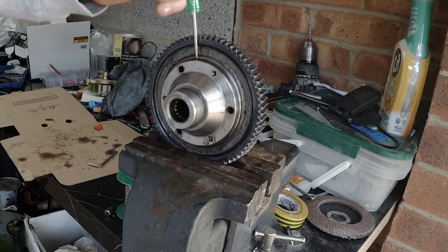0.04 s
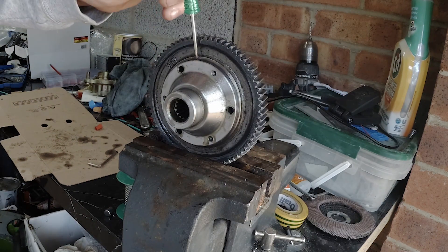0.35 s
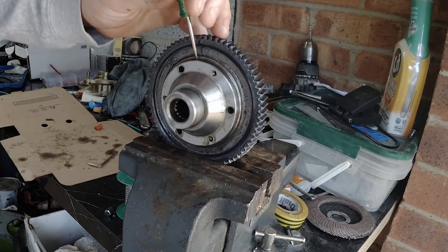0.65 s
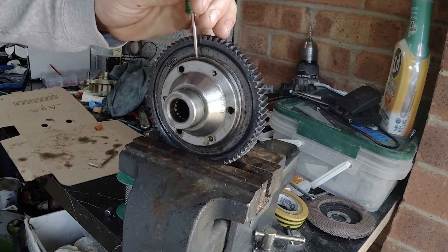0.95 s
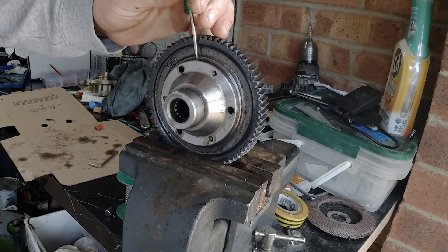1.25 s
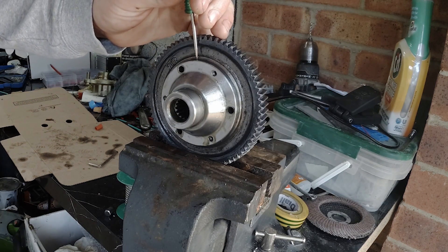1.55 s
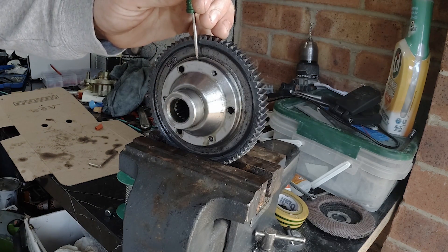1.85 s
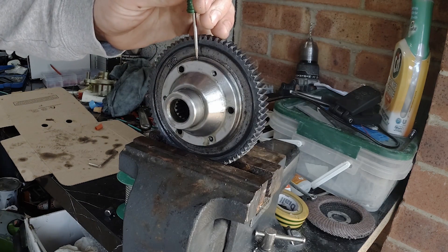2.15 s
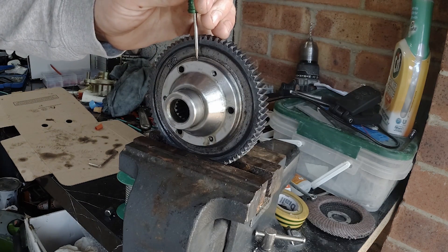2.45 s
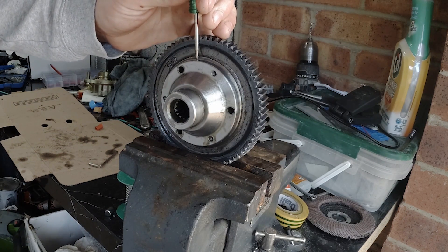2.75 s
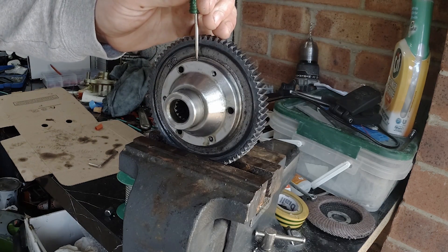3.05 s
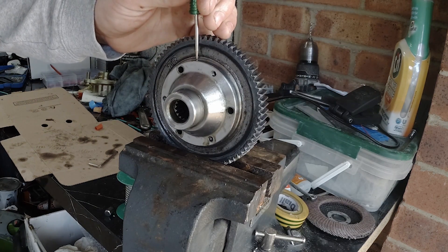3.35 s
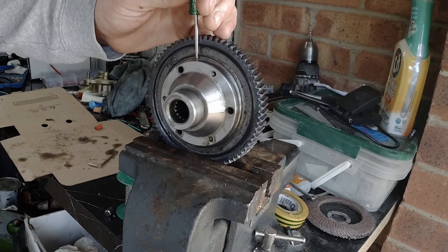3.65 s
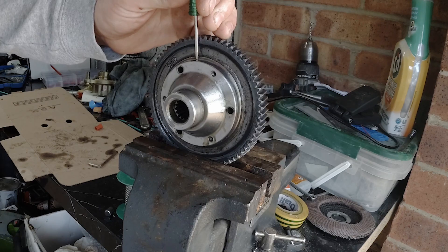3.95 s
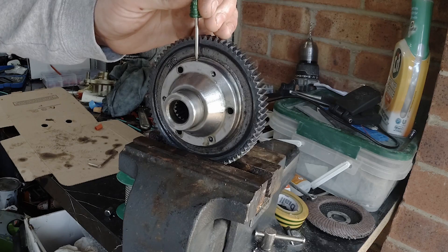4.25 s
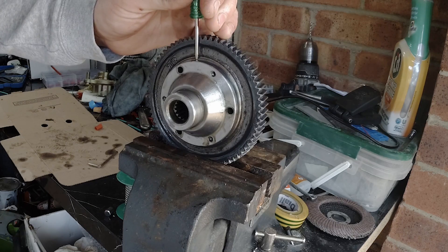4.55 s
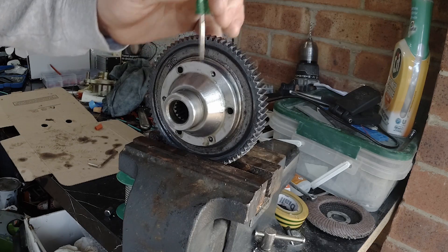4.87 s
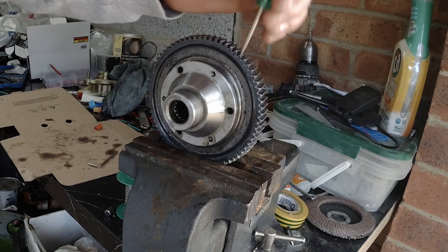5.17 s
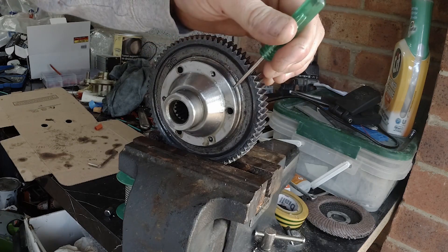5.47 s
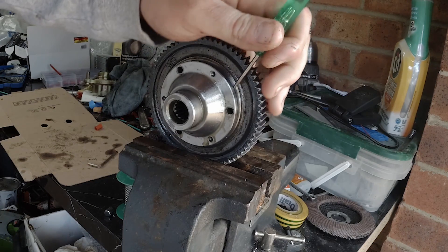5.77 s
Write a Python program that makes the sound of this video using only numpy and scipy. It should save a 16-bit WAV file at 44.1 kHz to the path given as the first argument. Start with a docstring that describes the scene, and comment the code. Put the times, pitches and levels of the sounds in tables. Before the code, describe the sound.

Close, steady hammer taps drive a screwdriver against a steel gear on a vise, after one light tick of the tip. The first blows are dull knocks with a sharp snap and a wooden bench thud; later ones quicken slightly and tighten into brighter clanks. A few soft metal ticks follow as the tool moves. Behind are a small workshop's quiet drone, hiss and very thin electrical whine.

```python
"""A hammer taps a screwdriver held as a punch on a steel ring gear, on a vise in a small brick workshop.
Each blow is a bright crack of the tool over the ringing modes of gear, jaws, vise and wooden bench.
The first blows land as dull knocks; as the gear seats they tighten into a higher clank over the thud.
The tip ticks as it is placed and moved. Behind: a low room drone, hiss and a thin electrical whine."""
import sys
import numpy as np
from scipy import signal
from scipy.fft import rfft, irfft, next_fast_len
from scipy.io import wavfile
from scipy.ndimage import map_coordinates

SR = 44100
rng = np.random.default_rng(int(sys.argv[2]) if len(sys.argv) > 2 else 0)


def generate_wav(signal):
    """Clip the signal to [-1, 1] and save it as 16-bit WAV at the path in sys.argv[1]."""
    frames = np.transpose(np.atleast_2d(signal))
    scaled = np.clip(frames, -1, 1) * 32767
    pcm = np.round(scaled).astype(np.int16)
    wavfile.write(sys.argv[1], SR, pcm)


N = 265041
T = np.arange(SR // 2) / SR  # time since a hit [s]

# tone of the air bed: (frequency [Hz], relative level [dB])
AIR_EQ = [(25, -38), (55, -21.5), (80, -31), (110, -15), (135, -21), (215, -4), (350, -14), (950, -21),
          (1600, -30.5), (2900, -40.5), (3600, -36.5), (4800, -41.5), (12500, -41), (15400, -37.5)]
# how alike its two sides are: (frequency [Hz], coherence [clipped at 1])
AIR_COHERENCE = [(60, 1.1), (300, 0.92), (700, 1.06), (1400, 0.82), (3000, -0.05), (7000, 0.76),
                 (15000, 0.34)]
# its balance: (frequency [Hz], left minus right [dB])
AIR_PAN = [(700, -0.5), (1300, 1), (2400, -5.5), (4400, -2), (8000, 0), (14000, -1.5)]
# fader ride of the drone: (time [s], level [dB])
DRONE_RIDE = [(0, -63), (1, -68.5), (1.6, -54), (2.5, -63.5), (4.8, -62), (6, -70.5)]
# electrical tones: (frequency [Hz], level [dB])
WHINE_TONES = [(15704, -77), (15644, -89)]
# reverb decay: (frequency [Hz], t60 [s])
ROOM_DECAY = [(150, 0.76), (500, 0.42), (1400, 0.3), (3000, 0.11), (7000, 0.1), (14000, 0.17)]
# slaps off bench and walls, negative inverts: (delay [s], knock gain [ratio], clank gain [ratio])
EARLY_ECHOES = [(.0082, -0.57, 0.033), (0.0138, 0.94, 0.24), (0.023, .75, 0.1)]
# the tip touches the gear: (time [s], level [dB])
TIP_TOUCHES = [(0.0921, -48.5), (4.9025, -56.5), (4.9277, -58.5), (5.3254, -57), (5.364, -64)]
# tone of the tick, the crack and the shading on the crack's far side: (frequency [Hz], gain [dB])
TICK_EQ = [(500, -49), (2800, -5), (3500, -16), (4000, 5.5), (4700, -8), (6500, -4), (10000, -9.5),
           (16000, -4.5)]
CRACK_EQ = [(400, -23), (1700, -2.5), (2150, -1.5), (2600, 0), (3300, 1.5), (4100, 0), (5400, -8.5),
            (6100, -5.5), (8000, -15.5), (8900, -12), (10500, -19), (12700, -20), (13800, -41),
            (16000, -10)]
FAR_SIDE_EQ = [(1500, 9.5), (4000, -11), (8000, -1.5), (13000, 3)]
# ring of each struck part: (frequency [Hz], relative level [dB], t60 [s])
BENCH_MODES = [(94.3, -6.5, 0.21), (128, -7, 0.26), (149.3, -14.5, 0.36), (178.1, -4.5, 0.33),
               (188.7, -1.5, 0.32), (206.7, 7.5, 0.19), (263.2, -7.5, 0.25), (273.5, -6, 0.47)]
VISE_MODES = [(149.6, -23, 0.44), (227.5, -19, 0.17), (295.8, -15.5, 0.24), (365.4, -30.5, 0.23),
              (433.6, 0.6, 0.1), (498.8, -19, 0.2), (551.4, -13.5, 0.22), (581, -17, 0.19), (664, 2, 0.037),
              (687.7, -7, 0.1)]
JAW_MODES = [(740, -2.5, 0.069), (841.8, -1, 0.096), (875, -12.5, 0.24), (950, -3.5, 0.11),
             (1054, -6.5, 0.086)]
GEAR_MODES = [(1185, -31, .13), (1260, -30, .11), (1335, -13.5, .16), (1368, -16.5, .15), (1405, -27, .11),
              (1568, -17, .11)]
SHAFT_MODES = [(2100, 3, 0.14), (2180, 3, 0.1), (2530, -13, 0.042), (3020, -6, 0.083), (3810, -1, 0.055),
               (3880, -18, 0.043), (5300, -30, 0.034), (5890, -9, 0.046), (8770, -7, 0.024),
               (8990, 3.5, 0.04)]
# each part's first heave, gone in a few cycles: (frequency [Hz], relative level [dB], t60 [s])
BENCH_PUNCH = [(225, -3, 0.023)]
VISE_PUNCH = [(196, -2, 0.01), (453, 13, 0.0089)]
JAW_PUNCH = [(667, 7.6, 0.011)]
GEAR_PUNCH = [(1174, 8.8, 0.013), (1363, 7.5, 0.014)]
# the mix moves from vise to jaws to gear as the gear is driven home: (seating [0 loose, 1 tight],
# crack [dB], bench thud [dB], vise knock [dB], jaw clack [dB], gear clank [dB], clank pitch [ratio],
# bite of the crack [dB])
SEATING_MIX = [ (.1, -37, -40.5, -26.5, -44.5, -46.5, 1.114, 1),
               (.28, -33, -43, -25.5, -34, -37.5, 1.056, 0.5),
               (.5, -33.3, -42.5, -34.5, -31.5, -33, 0.98, -3),
               (.73, -39, -42.5, -40.5, -42.5, -30, 1.04, 0), (.86, -34, -47, -40.5, -44.5, -30.5, 1.07, 8),
               (1, -34, -43.5, -39, -45.5, -34.5, 1.073, 6.5)]
# hammer hits: (time [s], force [dB], treble drive [dB], accent frequency [Hz], accent boost [dB])
HAMMER_HITS = [ (1.0076, -11.5, -12, 3900, 9), (1.2783, -5.5, 6, 2840, 7.5), (1.5584, -0.5, 4, 2910, 10.5),
               (1.838, 0, 0, 3920, 2), (2.112, 0.5, 4, 5600, 6.5), (2.3963, 0, 4, 5030, 7.5),
               (2.6536, -0.5, 3, 4700, 8), (2.9051, -1.5, 0, 4600, 4.5), (3.1272, -1.5, -6, 3500, 4.5),
               (3.3684, -2.5, 4, 3250, 6), (3.6, -3.5, -3, 4040, 4.5), (3.8316, -1, 0.5, 3860, 0.5),
               (4.054, -0.5, 5, 3870, 3.5), (4.2793, 0, 3.5, 3420, 7), (4.495, -2, -4, 3520, 6.5),
               (4.6888, -3, 1, 4970, 4)]


def amp(db):
    """Decibels to gain."""
    return 10 ** (np.asarray(db) / 20)


def unit(x):
    """Scale to rms 1."""
    return x / np.sqrt(np.mean(x ** 2) + 1e-20)


def along(points, hz):
    """Read a (frequency, value) curve on a log-frequency axis."""
    freqs, values = np.transpose(points)
    return np.interp(np.log(hz + 1), np.log(freqs + 1), values)


def bell(hz, centre_hz, width):
    """An EQ bell of height 1 on a log-frequency axis."""
    return np.exp(-(np.log((hz + 1) / centre_hz) / width) ** 2)


def pan(lean_db):
    """Left and right gains; positive leans left."""
    return amp(np.array([[1], [-1]]) * lean_db / 2)


def filtered(x, response):
    """Filter x by a gain given as a function of frequency."""
    n = x.shape[-1]
    size = next_fast_len(n + 8192)
    return irfft(rfft(x, size) * response(np.fft.rfftfreq(size, 1 / SR)), size)[..., :n]


def add(track, start_s, sound):
    """Drop a sound onto the track."""
    part = track[:, round(start_s * SR):][:, :sound.shape[-1]]
    part += sound[..., :part.shape[-1]]


def wobble(rate_hz):
    """A smooth random modulator."""
    knots = rng.standard_normal(int(N * rate_hz / SR) + 4)
    return map_coordinates(knots, [np.arange(N) * rate_hz / SR])


def click(colour):
    """An impulse with this tone colour and unit energy."""
    gain = colour(np.fft.rfftfreq(len(T), 1 / SR))
    cepstrum = irfft(np.log(np.maximum(gain, 1e-6)))
    cepstrum[1:len(T) // 2] *= 2  # minimum phase keeps the attack sharp
    cepstrum[len(T) // 2:] = 0
    pulse = irfft(np.exp(rfft(cepstrum)))
    return pulse / np.linalg.norm(pulse)


def burst(colour, t60):
    """A fast-dying snap of coloured noise."""
    snap = rng.standard_normal(len(T)) * amp(-60 * T / t60)
    return signal.fftconvolve(snap, click(colour))[:len(T)]


def ring(modes, scatter_db, attack_s, detune=0):
    """Damped modes in alternating polarity, with random scatter of level and pitch."""
    hz, db, t60 = np.transpose(modes)[:, :, None]
    polarity = (-1) ** np.arange(len(hz))[:, None]
    envelope = amp(db + scatter_db * rng.standard_normal(hz.shape) - 60 * T / t60)
    hz = hz * (1 + detune * rng.standard_normal(hz.shape))
    partials = polarity * envelope * np.sin(2 * np.pi * hz * T)
    return partials.sum(axis=0) * (1 - np.exp(-T / attack_s))


def reverb(x, width):
    """A fresh diffuse room tail, centred in the bass and wide in the treble."""
    hz, t, noise = signal.stft(rng.standard_normal((2, len(T))), SR, nperseg=256)
    decay = amp(-60 * t / along(ROOM_DECAY, hz)[:, None])
    mid, side = signal.istft(noise * decay, SR, nperseg=256)[1][:, :len(T)]
    side = filtered(side, lambda f: width * f / np.hypot(f, 2000))
    tail = np.array([mid + side, mid - side]) * (1 - np.exp(-T / 0.0049))
    return signal.fftconvolve(x[None], tail / np.linalg.norm(tail[0]), axes=1)[:, :len(T)]


def echoed(x, column):
    """x plus its early echoes through the bench and off the walls."""
    return x + sum(echo[column] * np.pad(x, (round(echo[0] * SR), 0))[:len(x)] for echo in EARLY_ECHOES)


def air():
    """A steady bed of air noise whose width and balance vary with frequency."""
    def mid_side_gains(hz):
        spread = np.arccos(np.clip(along(AIR_COHERENCE, hz), -1, 1)) / 2
        return amp(along(AIR_EQ, hz)) * [np.cos(spread), np.sin(spread)]

    mid, side = filtered(rng.standard_normal((2, N)), mid_side_gains)
    bed = filtered(np.array([mid + side, mid - side]), lambda hz: pan(along(AIR_PAN, hz)))
    return amp(-58) * unit(bed)


def drone():
    """The room's strongest resonance wavers, then swells once into a steadier hum."""
    pitch_hz, half_width_hz = 226.9, 5.9
    swell_at_s, swell_half_s, swell_db = 5.46, 0.21, -55
    t = np.arange(N) / SR
    noise = rng.standard_normal(N)
    murk = unit(filtered(noise, lambda hz: 1 / (1 + ((hz - pitch_hz) / half_width_hz) ** 2)))
    hum = unit(np.sin(2 * np.pi * pitch_hz * t + 0.4 * wobble(rate_hz=8)))
    swell = np.exp(-((t - swell_at_s) / swell_half_s) ** 2)
    fader = amp(np.interp(t, *np.transpose(DRONE_RIDE)))
    return fader * (1 - swell) * murk + amp(swell_db) * swell * hum


def whine():
    """Two thin electrical tones, off to the right."""
    t = np.arange(N) / SR
    return sum(amp(db) * np.sin(2 * np.pi * hz * t) for hz, db in WHINE_TONES) * pan(lean_db=-18.5)


def tip_ticks():
    """Light ticks of the screwdriver's tip on the gear."""
    track = np.zeros((2, N))
    for start_s, db in TIP_TOUCHES:
        tick = amp(db) * burst(lambda hz: amp(along(TICK_EQ, hz)), t60=0.016)
        add(track, start_s, tick + amp(-4.5) * reverb(tick, width=1.0))
    return track


def vise_and_bench(thud_db, knock_db, clack_db):
    """The body of the hit: the blow passes through the vise and its jaws into the wooden bench."""
    knock = amp(knock_db) * ring(VISE_PUNCH, scatter_db=0, attack_s=0.00081)
    clack = amp(clack_db) * ring(JAW_PUNCH, scatter_db=1.3, attack_s=0.00043)
    thud = amp(thud_db) * ring(BENCH_PUNCH, scatter_db=2, attack_s=0.0008)
    vise = amp(knock_db) * ring(VISE_MODES, scatter_db=1.5, attack_s=0.0035)
    jaws = amp(clack_db) * ring(JAW_MODES, scatter_db=1, attack_s=0.0043, detune=0.0094)
    bench = amp(thud_db) * ring(BENCH_MODES, scatter_db=2.5, attack_s=0.0021)
    tail = amp(-10) * reverb(knock + clack, width=3)
    return echoed(knock, column=1) + clack + thud + vise + jaws + bench + tail


def gear(clank_db, clank_pitch):
    """The gear gives a few strong cycles, shifted in pitch from blow to blow, then rings faintly."""
    punch_modes = np.array(GEAR_PUNCH) * [clank_pitch, clank_pitch, 1]  # also nudges the level
    clank = amp(clank_db) * ring(punch_modes, scatter_db=-0.3, attack_s=0.00077)
    ring_out = amp(clank_db + 2) * ring(GEAR_MODES, scatter_db=0.8, attack_s=0.003)
    tail = amp(-17) * reverb(clank, width=1.2)
    return echoed(clank, column=2) * pan(lean_db=3.8) + ring_out + tail


def steel_zing(knock_db):
    """The blow wakes a brief, very high ring of the steel, never twice the same."""
    zing = burst(lambda hz: 1 / (1 + ((hz - 13650) / 160) ** 2), t60=0.068)
    return amp(knock_db - 35) * zing * pan(lean_db=-10)


def screwdriver(crack_db, treble_db, bite_db, accent_hz, accent_db):
    """Hammer on handle, tip on steel: a click and a brief chatter; the shaft rings on."""
    def colour(hz):
        shelf = treble_db * along([(4000, 0.15), (7000, 0.71)], hz)
        bite = bite_db * bell(hz, centre_hz=1870, width=0.35)
        return amp(along(CRACK_EQ, hz) + shelf + bite)

    def accented(hz):  # where the head lands lifts one band
        return colour(hz) * amp(accent_db * bell(hz, accent_hz, width=0.13))

    snap = click(accented)
    near = amp(4) * snap + amp(-1.5) * burst(accented, t60=0.013)
    # the far side, on the right, is shaded from the crack, then gets a slap off the bricks
    far = amp(-22) * near + amp(-2.5) * burst(accented, t60=0.013)
    far = filtered(far, lambda hz: amp(along(FAR_SIDE_EQ, hz)))
    slap_s = 0.0047
    slap = amp(-12) * filtered(burst(colour, t60=0.016), lambda hz: np.exp(-2j * np.pi * hz * slap_s))
    shaft = np.array([ring(SHAFT_MODES, scatter_db=5, attack_s=0.002) for ear in range(2)])
    tail = amp(8) * reverb(snap, width=1.08)
    return amp(crack_db + 4.5) * (np.array([near, far + slap]) + tail + amp(-31.5) * shaft)


def hammering():
    """Every blow drives all the parts and seats the gear further, in proportion to its force."""
    track = np.zeros((2, N))
    driven = np.cumsum([amp(hit[1]) for hit in HAMMER_HITS])
    stages, *curves = np.transpose(SEATING_MIX)
    for hit, seating in zip(HAMMER_HITS, driven / driven[-1]):
        start_s, force_db, treble_db, accent_hz, accent_db = hit
        *levels, clank_pitch, bite_db = [np.interp(seating, stages, curve) for curve in curves]
        crack_db, thud_db, knock_db, clack_db, clank_db = force_db + np.array(levels)
        add(track, start_s, screwdriver(crack_db, treble_db, bite_db, accent_hz, accent_db))
        body = vise_and_bench(thud_db, knock_db, clack_db)
        add(track, start_s + 0.00023, body + gear(clank_db, clank_pitch) + steel_zing(knock_db))
    return track


def scene():
    """Hammer and tool ticks up front, room tone behind."""
    return hammering() + tip_ticks() + air() + drone() + whine()


def record(dry):
    """Master EQ: shed the deep bass and roll off just above the whine."""
    low_cut_hz, top_hz = 63, 16300
    trimmed = signal.sosfilt(signal.butter(3, low_cut_hz, "highpass", fs=SR, output="sos"), dry)
    return filtered(trimmed, lambda hz: amp(np.interp(hz, [15750, 16000], [0, -18])) * (hz < top_hz))


dry = scene()
out = record(dry)
generate_wav(out)
```